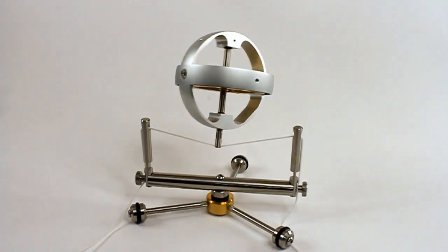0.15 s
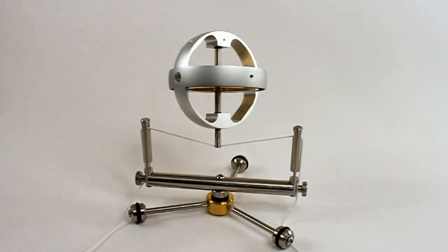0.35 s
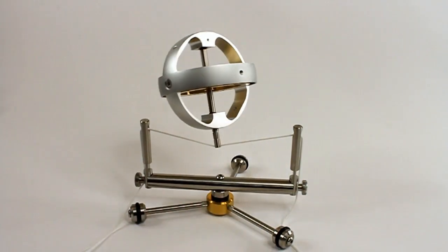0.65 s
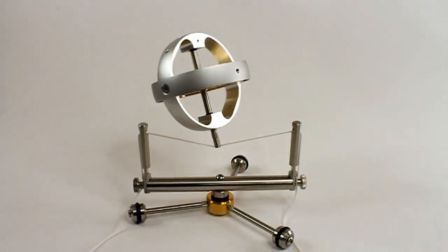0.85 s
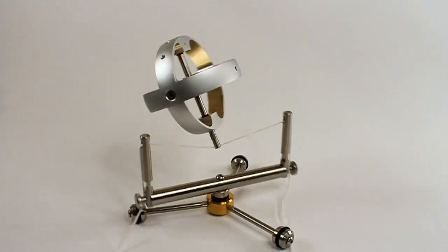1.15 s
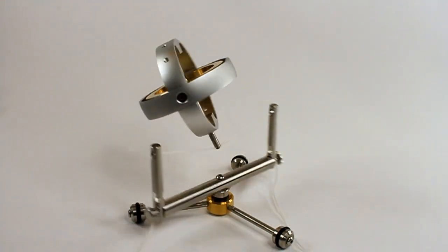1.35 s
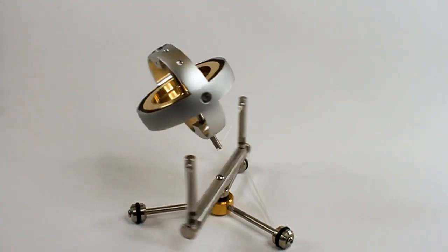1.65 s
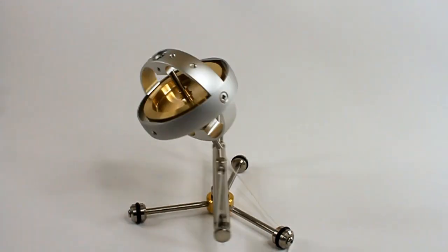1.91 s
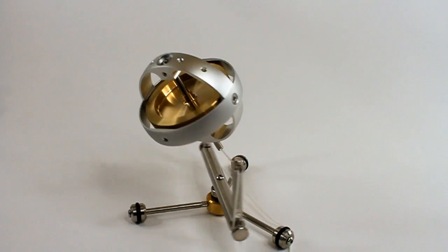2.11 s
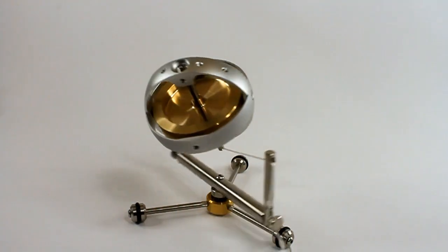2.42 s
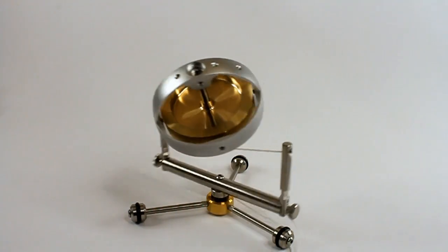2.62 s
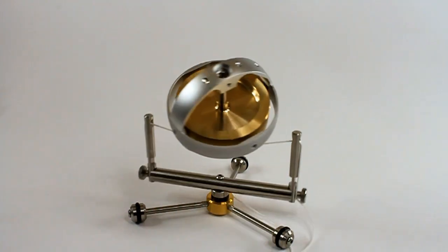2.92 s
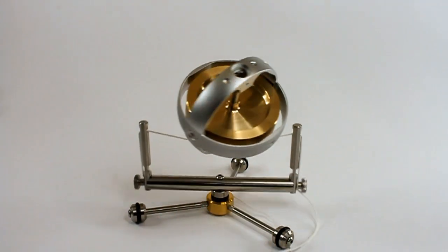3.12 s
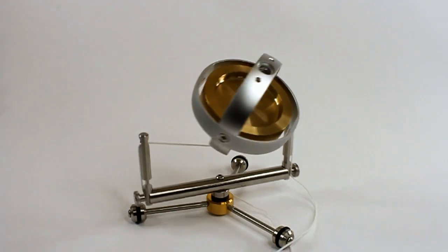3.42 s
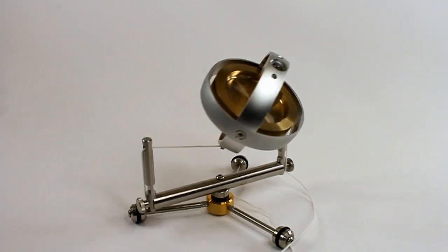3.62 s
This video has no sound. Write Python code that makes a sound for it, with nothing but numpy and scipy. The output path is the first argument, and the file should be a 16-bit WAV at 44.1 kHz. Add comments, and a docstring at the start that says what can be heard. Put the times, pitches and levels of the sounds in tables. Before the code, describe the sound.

Close up in a quiet room, a gyroscope spins with a continuous whirr, its ringing tones wavering over a fizzy bearing hiss. The high whine eases past halfway, as the swinging stand knocks softly and later ticks lightly.

```python
"""A quiet room: close by, a brass gyroscope spins on a string stretched over a pivoting stand.
The slowing rotor sounds a row of harmonics; its ball bearings hiss and ring the metal cage.
As the cage leans and swings round, tones and resonances swell and fade.
The stand rumbles, knocks and ticks softly. Faint mains hum lies below."""
import sys
import numpy as np
from scipy import signal
from scipy.fft import rfft, irfft
from scipy.io import wavfile

SR = 44100
rng = np.random.default_rng(int(sys.argv[2]) if len(sys.argv) > 2 else 0)


def wrap_up_sound(samples):
    """Save the sound to the file named by the first command line argument, as 16-bit audio."""
    columns = np.atleast_2d(samples).T
    # keep every value between -1 and 1, then stretch to whole-number steps
    tamed = np.clip(columns, -1, 1)
    steps = np.round(tamed * 32767).astype(np.int16)
    wavfile.write(sys.argv[1], SR, steps)


N = 165816

T = np.arange(N) / SR
BINS_HZ = np.maximum(np.arange(N // 2 + 1) * SR / N, 1)
SPIN_HZ, SLOWING_HZ_PER_S = 138.62, .697


def from_db(db):
    """Decibels to gain."""
    return 10 ** (np.asarray(db) / 20)


def curve(rows):
    """Rows of (t/s, value) joined by straight lines."""
    return np.interp(T, *np.transpose(rows))


def swell(top_db, at_s, half_width_s, depth_db):
    """Gain of a vibration that grows and fades once: a bell curve in dB."""
    return from_db(top_db - depth_db * (1 - np.exp(-((T - at_s) / half_width_s) ** 2)))


def resonant_noise(hz, width_hz):
    """Noise in one steep-sided resonance; rms 1."""
    shape = 1 / (1 + 2 * ((BINS_HZ - hz) / width_hz) ** 2)
    return irfft(rfft(rng.standard_normal(N)) * shape, N) / np.sqrt(np.mean(shape ** 2))


def coloured_noise(spectrum):
    """Noise shaped by rows of (f/Hz, density/dB per Hz)."""
    hz, db = np.transpose(spectrum)
    shape = from_db(np.interp(np.log(BINS_HZ), np.log(hz), db))
    return irfft(rfft(rng.standard_normal(N)) * shape, N) * np.sqrt(SR / 2)


def tone(phase, flutter, flutter_hz=24):
    """A sine fluttering in level and phase; rms 1."""
    wobble = (resonant_noise(0, flutter_hz) + 1j * resonant_noise(0, flutter_hz)) / np.sqrt(2)
    carrier = np.exp(1j * (phase + rng.uniform(0, 2 * np.pi)))
    return np.real((1 + flutter * wobble) * carrier) * np.sqrt(2 / (1 + flutter ** 2))


def ring(at_s, hz, t60_s):
    """A struck mode: a unit sine dying away."""
    age_s = np.maximum(T - at_s, 0)
    return np.sin(2 * np.pi * hz * age_s) * from_db(-60 * np.minimum(age_s / t60_s, 5))


def rotor(angle):
    """Harmonics locked to the spin: throbbing leaders, weaker swelling ones, a faint buzz."""
    # leading harmonics as the cage turns: t/s, level/dB
    whine = [(0, -72), (0.09, -62), (0.16, -44.5), (0.59, -44), (0.64, -60), (0.69, -40), (0.87, -41),
             (0.955, -33), (1.01, -44), (1.06, -37.5), (1.152, -39.5), (1.19, -35), (1.3, -34),
             (1.49, -34.5), (1.58, -43), (1.64, -37.5), (1.685, -42), (1.73, -35), (1.79, -44), (1.84, -44),
             (1.88, -37), (1.92, -45), (2.15, -42), (2.26, -56), (2.75, -56), (3.5, -50), (3.76, -57)]
    middle = [(0, -91), (0.5, -53.5), (0.9, -60), (1.44, -61), (1.5, -51), (1.72, -52), (1.79, -49),
              (1.83, -41.5), (1.865, -50.5), (1.91, -39.5), (1.95, -53), (1.99, -41.5), (2.04, -44.5),
              (2.1, -46), (2.38, -51.5), (2.499, -59), (3.1, -54.5), (3.76, -59)]
    late = [(0, -73), (1.15, -60), (2.55, -73), (2.9, -61), (3.01, -52.5), (3.2, -52), (3.26, -45.5),
            (3.36, -51), (3.415, -42), (3.445, -52), (3.48, -41), (3.53, -52), (3.585, -43.5), (3.63, -49),
            (3.76, -49)]
    upper_middle = [(0.0, -65), (0.33, -55), (1.5, -55), (1.92, -70), (2.41, -51.5), (3.37, -59),
                    (3.57, -69), (3.76, -52.5)]
    low = [(0, -68), (.45, -60), (.85, -60), (1.4, -74), (1.7, -76), (2, -67), (2.4, -74), (3, -67),
           (3.3, -64.5), (3.76, -65)]
    low_middle = [(0, -73), (1.05, -69), (1.45, -61.5), (1.95, -68), (2.3, -65), (2.65, -75), (3, -68),
                  (3.25, -61), (3.76, -61)]
    # order (multiple of the spin), level curve, trim/dB, flutter share
    leaders = [(29, whine, 0, .22), (11, middle, -2.5, .25), (12, late, -1, .2),
               (23, upper_middle, 1.5, .28), (6, low, 0, .12), (7, low_middle, 0, .12)]
    # weaker harmonics: order, top/dB, t/s, half-width/s, depth/dB
    weaker = [ (1, -64.5, 0.39, 1.75, 15), (5, -66.5, 0.57, 1.2, 18.5), (8, -55.5, 3.08, 1.44, 18),
              (9, -67.5, 3.2, 1, 11), (10, -60.5, 2.94, 0.52, 5), (13, -57, 0.45, 0.27, 8),
              (14, -57.5, 1.3, 0.7, 7), (15, -62, 1.93, 0.9, 12.5), (22, -55.5, 0.82, 0.48, 6.5),
              (24, -57, 2.7, 0.79, 11), (27, -63, 2.5, 1.6, 20), (30, -51, 1.7, 1.2, 5),
              (31, -59, 2.4, 1.25, 10), (32, -54, 0.5, .7, 16), (43, -53, 1.1, 0.82, 6),
              (44, -47.5, 1.43, 0.57, 16), (45, -52, 4, 2, 17)]
    # outline of all other harmonics: order, level/dB
    buzz_outline = [(4, -87), (16, -75.5), (26, -73.5), (35, -77.5), (41, -70.5), (46, -61), (52, -67)]
    lead = sum(from_db(curve(level) + trim_db) * tone(order * angle, flutter)
               for order, level, trim_db, flutter in leaders)
    # high orders are the least steady
    swelling = sum(swell(*shape) * tone(order * angle, flutter=.018 * order, flutter_hz=15)
                   for order, *shape in weaker)
    listed = [row[0] for row in leaders + weaker]
    buzz = np.zeros(N)
    for order in range(4, 53):
        if order not in listed:
            rms = from_db(np.interp(order, *np.transpose(buzz_outline)))
            buzz += rms * np.sqrt(2) * np.cos(order * angle + rng.uniform(0, 2 * np.pi))
    throb = 1 + .25 * resonant_noise(hz=27, width_hz=7)
    return lead * throb + swelling + buzz


def cage_shimmer():
    """The two sharpest cage modes hold their pitch while the rotor slows."""
    # each mode as the cage turns: t/s, level/dB
    lower = [(0, -51.5), (0.37, -54), (0.42, -48.5), (0.58, -54), (0.67, -48.5), (0.77, -54.5),
             (0.97, -46.5), (1.03, -52), (1.19, -48), (1.24, -63), (1.58, -64), (1.66, -54), (2.1, -60),
             (3.76, -65)]
    upper = [(0, -72), (1.2, -56), (1.44, -56), (1.59, -45), (1.615, -51), (1.65, -45), (1.71, -53),
             (1.84, -45), (1.87, -57), (1.92, -53), (1.96, -57), (2.01, -50), (2.15, -52), (2.62, -64),
             (2.79, -53), (2.87, -69), (3.12, -62), (3.26, -50), (3.42, -61), (3.56, -50), (3.76, -67)]
    modes = [(4447, lower, .9), (5221, upper, 1.0)]   # f/Hz, level curve, flutter share
    trim_db = .8
    return sum(from_db(curve(level) + trim_db) * tone(2 * np.pi * hz * T, flutter)
               for hz, level, flutter in modes)


def bearings(angle):
    """Rolling balls hiss and ring the cage, unevenly and pulsing with each turn."""
    # strongest cage resonances as the cage turns: t/s, level/dB
    buzz = [(0, -69), (0.25, -64), (0.55, -50.5), (0.85, -50.5), (1.35, -42.5), (1.7, -48.5), (2.05, -53.5),
            (2.45, -43.5), (2.8, -50.5), (3.05, -48.5), (3.6, -40.5), (3.76, -41)]
    fizz = [(0, -50.5), (0.7, -48), (1.08, -52), (1.4, -38.5), (1.652, -54.2), (1.8, -48), (2.0, -41),
            (2.15, -54), (2.42, -54), (2.55, -44.5), (3.25, -54), (3.6, -48.5), (3.76, -48)]
    sizzle = [(0, -47.5), (0.25, -48.5), (0.78, -37), (0.95, -36.5), (1.12, -55), (1.25, -44), (1.5, -39.5),
              (1.75, -39), (2.1, -40.5), (2.45, -43), (2.95, -44), (3.3, -45.5), (3.42, -42.6),
              (3.65, -41.5), (3.76, -42)]
    shrill = [(0, -62), (0.3, -48), (0.85, -45), (1.05, -39.5), (1.22, -65), (1.45, -39.5), (1.58, -36.5),
              (1.75, -42.5), (1.93, -44), (2.1, -42.5), (2.45, -40.5), (2.9, -52), (3.3, -62), (3.65, -40),
              (3.76, -59)]
    sheen = [(0, -48.6), (0.25, -56), (0.45, -53.5), (0.75, -39), (0.9, -37), (1.1, -52), (1.35, -43),
             (1.698, -49), (2.2, -59), (2.6, -40), (2.9, -44), (3.35, -58), (3.76, -41)]
    # f/Hz, width/Hz, level curve, trim/dB
    strong_modes = [(6070, 220, buzz, -.5), (9320, 280, fizz, 1.1), (11300, 670, sizzle, .3),
                    (10725, 170, shrill, 1.3), (14470, 260, sheen, -3.5)]
    # weaker resonances: f/Hz, width/Hz, top/dB, t/s, half-width/s, depth/dB
    weak_modes = [ (1065, 30, -62.5, 2.9, .9, 6.5), (1625, 49, -56.5, 3.27, 0.43, 4.5),
                  (1940, 50, -60, 2, 0.72, 3.5), (2260, 150, -54.5, 1.3, 0.16, 14.5),
                  (3207, 170, -55, 2.74, 1.27, 27), (2445, 30, -59, 2.6, .9, 7),
                  (4015, 100, -46, 1.3, 1.8, 5.5), (4390, 220, -54.5, 2.23, 1.5, 7),
                  (6580, 1300, -45, 1.93, 0.28, 13.5), (7475, 60, -53, .5, .7, 4),
                  (8585, 55, -54, 1.8, .7, 6), (10243, 30, -50, 1.6, 1.5, 3), (13035, 75, -44, 1.42, .3, 7),
                  (13460, 80, -47.5, 2.7, .55, 8), (15350, 90, -51, 3.5, .7, 4),
                  (9540, 110, -49.5, 0.53, 1.1, 17), (10110, 250, -46.5, 2.2, 0.33, 5.5),
                  (11630, 120, -46.5, 0.82, 2, 5), (6530, 360, -49, 0.86, 0.34, 11),
                  (13150, 670, -50, 2.5, .35, 11), (14000, 270, -47, 0.6, .5, 6)]
    # broad hiss: f/Hz, density/dB per Hz
    hiss_spectrum = [(150, -96), (350, -91.5), (600, -92), (1000, -88), (1400, -90), (2000, -90),
                     (2750, -88), (3600, -84.5), (4600, -83), (5450, -88.5), (6400, -84.5), (7100, -82),
                     (7800, -87.5), (8350, -88), (8900, -82), (9800, -86.5), (10500, -76.5), (11900, -86.5),
                     (12700, -78.5), (13800, -83.5), (14800, -77), (15400, -84.5), (15800, -95)]
    # its drift: t/s, gain/dB
    hiss_drift = [(0, -0.5), (.4, -1), (.85, 0.5), (1.08, 0.5), (1.3, 2.5), (1.6, 0.5), (2.0, 1), (2.2, 0),
                  (2.6, -0.5), (3.0, 1.5), (3.3, 1), (3.6, 0.5), (3.76, -1.5)]
    cage = sum(from_db(curve(level) + trim_db) * resonant_noise(hz, width_hz)
               for hz, width_hz, level, trim_db in strong_modes)
    cage += sum(swell(*shape) * resonant_noise(hz, width_hz) for hz, width_hz, *shape in weak_modes)
    hiss = from_db(curve(hiss_drift)) * coloured_noise(hiss_spectrum)
    rattle_db = .77 * resonant_noise(0, width_hz=37.3)
    turn_pulse = 1 + .044 * np.cos(angle)
    return (cage + hiss) * from_db(rattle_db) * turn_pulse


def reflections(direct, t60_s=.13, wet_db=-6.5, gap_s=.002):
    """Nearby surfaces add a short wash that ripples the spectrum at the same overall level."""
    tail = rng.standard_normal(N) * from_db(-60 * T / t60_s) * (T > gap_s)
    wash = signal.fftconvolve(direct, tail / np.linalg.norm(tail))[:N]
    wet = from_db(wet_db)
    return (direct + wet * wash) / np.sqrt(1 + wet ** 2)


def stand(knock_attack_s=.004):
    """The swinging stand rumbles faintly, knocks softly and ticks at its pivot."""
    # knocks: t/s, f/Hz, t60/s, level/dB
    knock_events = [(1.908, 140, .16, -49), (1.94, 125, .16, -53), (2.268, 152, .25, -54),
                    (2.36, 44, .25, -54)]
    # pivot ticks: t/s, level/dB
    tick_events = [(3.028, -46), (3.037, -47), (3.342, -42)]
    # modes of a tick: f/Hz, gain/dB, t60/s
    tick_modes = [(1970, 3, 0.025), (2290, 4, 0.028), (2650, 0, .025), (3220, -3, 0.022)]
    rumble_gain = swell(top_db=-69, at_s=1.5, half_width_s=.5, depth_db=12)
    rumble = rumble_gain * resonant_noise(hz=44.7, width_hz=14)
    knocks = sum(from_db(db) * ring(at_s, hz, t60_s) * np.clip((T - at_s) / knock_attack_s, 0, 1)
                 for at_s, hz, t60_s, db in knock_events)
    ticks = sum(from_db(db + mode_db) * ring(at_s, hz, t60_s)
                for at_s, db in tick_events for hz, mode_db, t60_s in tick_modes)
    return rumble + knocks + ticks


def room():
    """Low room noise and mains hum."""
    # noise floor: f/Hz, density/dB per Hz
    floor_spectrum = [(20, -120), (32, -112), (45, -92), (62, -91), (100, -88.5), (180, -94.5),
                      (350, -93.5), (1000, -94), (8000, -115)]
    # hum partials: f/Hz, level/dB
    mains = [(50, -71), (100, -68.5), (350, -76)]
    floor = coloured_noise(floor_spectrum)
    hum = sum(from_db(db) * np.sqrt(2) * np.sin(2 * np.pi * (hz * T + rng.random())) for hz, db in mains)
    return floor + hum


def scene():
    """All sources at one microphone, alike in both channels."""
    angle = 2 * np.pi * np.cumsum(SPIN_HZ - SLOWING_HZ_PER_S * T) / SR
    mono = rotor(angle) + cage_shimmer() + reflections(bearings(angle)) + stand() + room()
    return np.array([mono, mono])


def record(dry):
    """Steep low-pass on the top treble."""
    cutoff_hz = 15750
    return signal.sosfilt(signal.ellip(12, .1, 80, cutoff_hz, fs=SR, output="sos"), dry)


dry = scene()
out = record(dry)
wrap_up_sound(out)
```